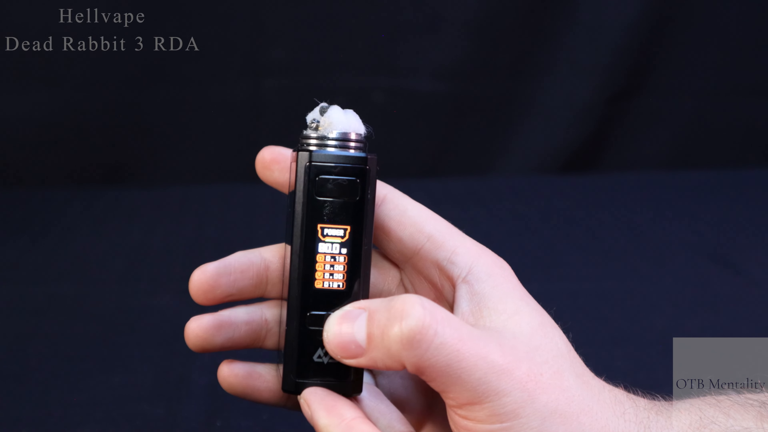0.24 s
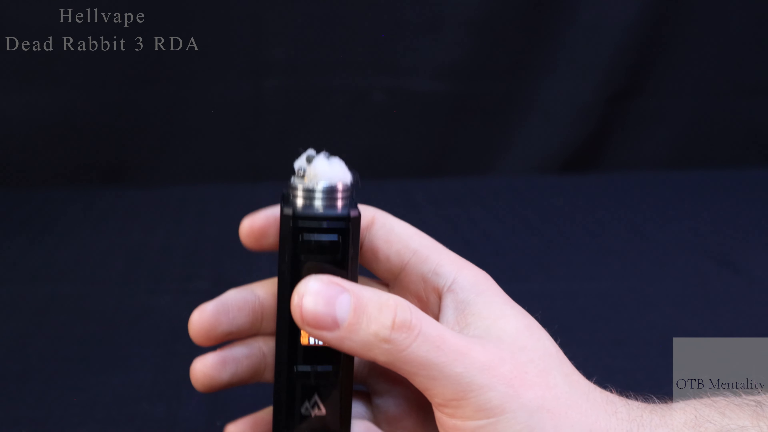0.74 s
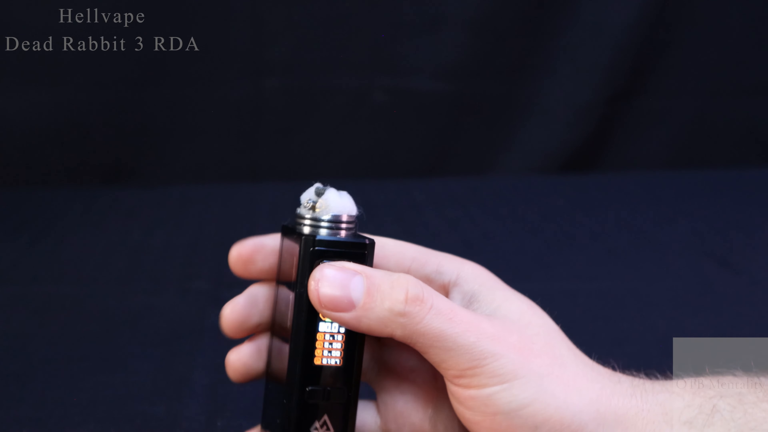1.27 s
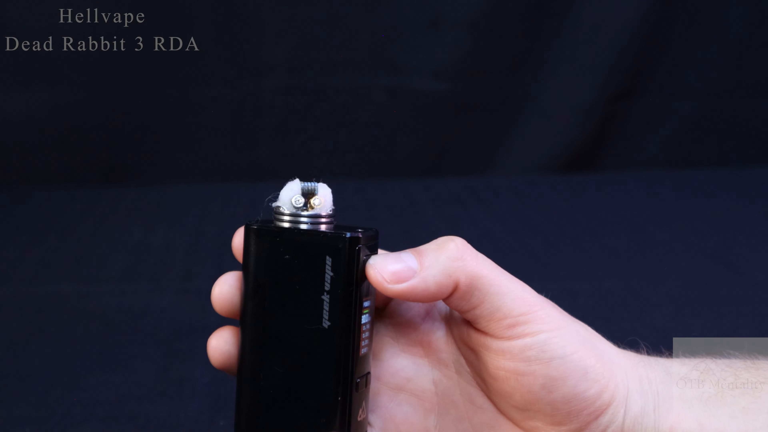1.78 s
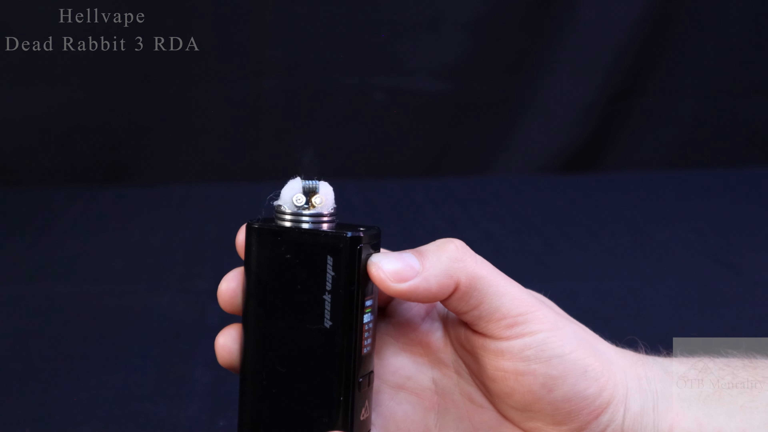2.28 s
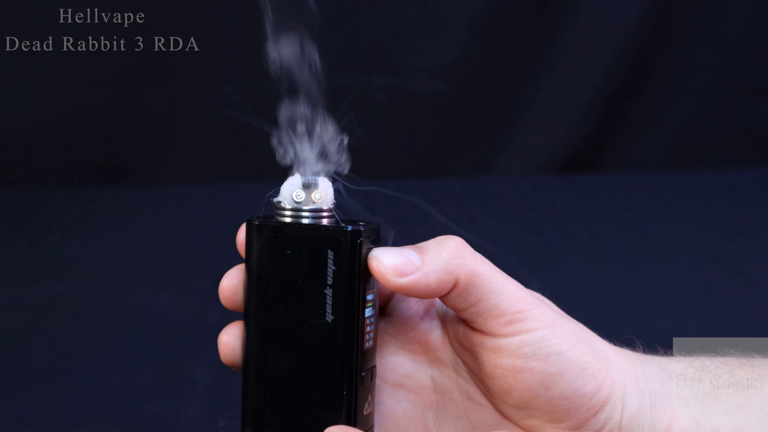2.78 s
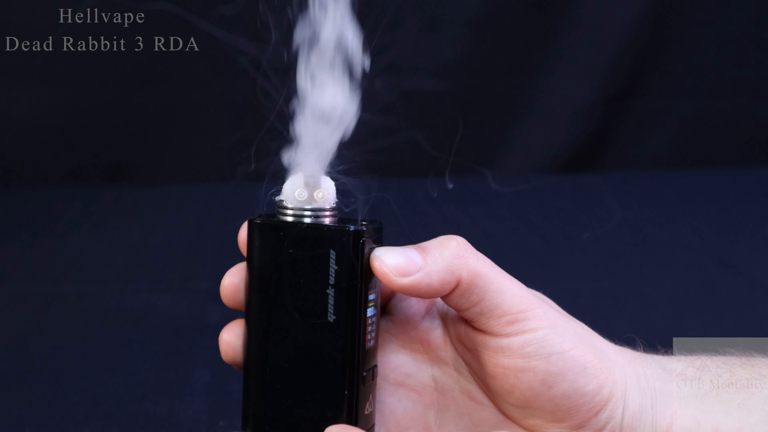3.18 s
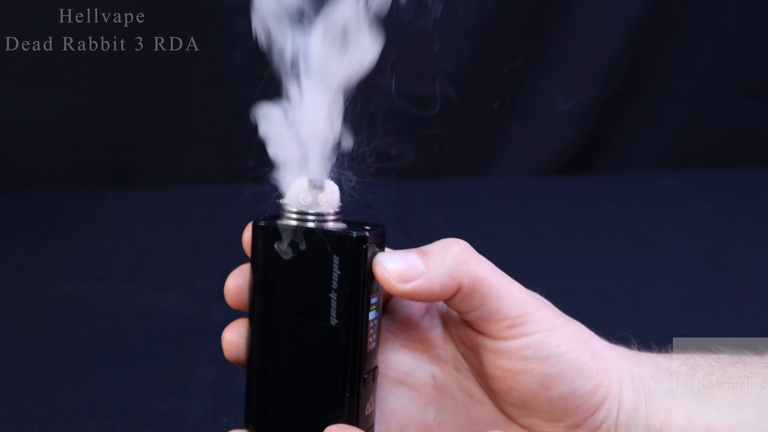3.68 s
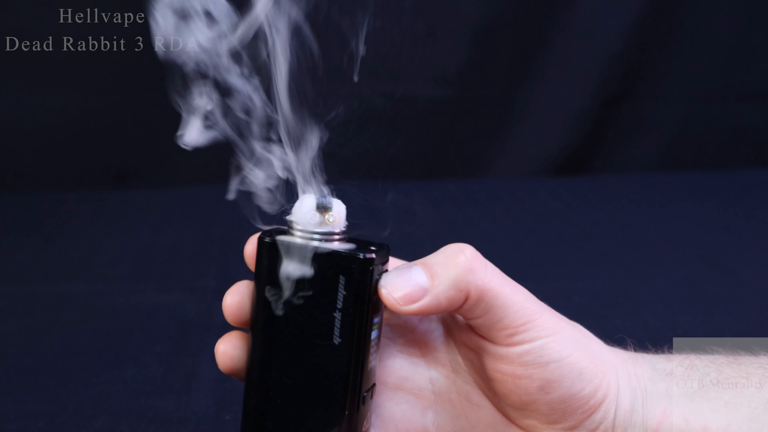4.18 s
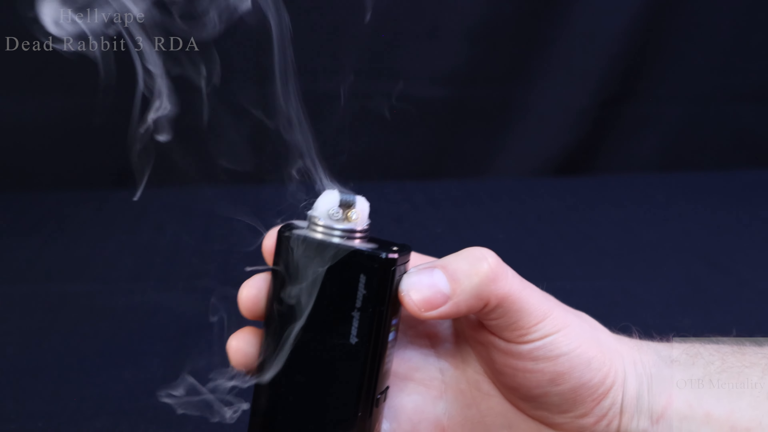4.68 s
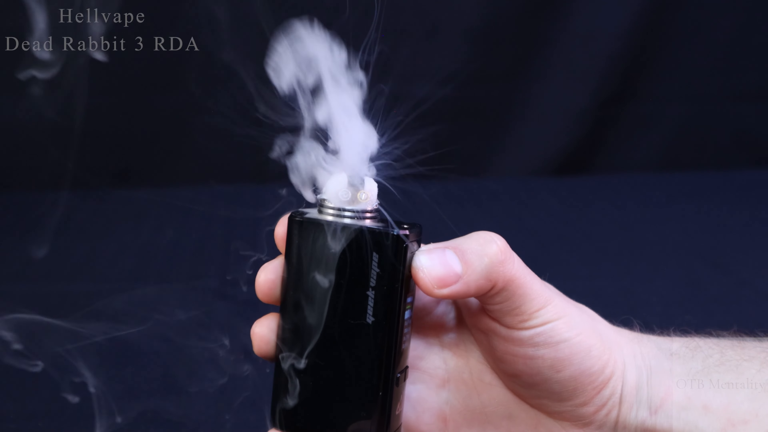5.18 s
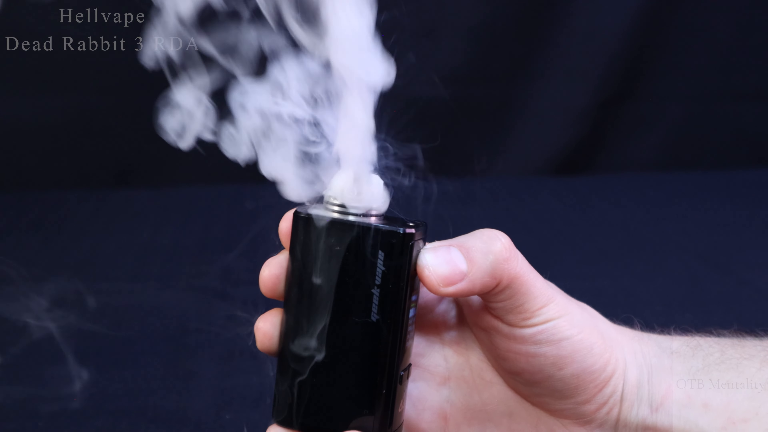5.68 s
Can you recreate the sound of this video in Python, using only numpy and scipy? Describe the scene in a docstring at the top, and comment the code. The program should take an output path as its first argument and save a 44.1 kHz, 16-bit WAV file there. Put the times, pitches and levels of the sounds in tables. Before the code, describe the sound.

Close view of a vaping device in a hushed room with faint hiss and low rumble. First come soft handling thumps, small ticks and skin sliding. A small button snap starts a thin fizz that thickens into boiling crackle. A drop spits, the sizzle dies down, then a second press revives it quickly, with sharper spits and a heavy thud.

```python
"""In a small quiet room, fingers tick and slide on a vaping device while soft thumps set the microphone stand ringing.
The fire button snaps on modes of the case; band-limited bubble bursts start as fine fizz, then coarser boiling joins.
A drop spits, the button is let go and the sizzle dies away as the wire cools.
A second press heats the warm coils faster, and the fizz and boil return with more spits and thumps to the end.
Room tone, hiss and a slow sway of the stand, all shaped noise, lie underneath throughout."""
import sys
import numpy as np
from scipy import signal
from scipy.fft import rfft, irfft, next_fast_len
from scipy.io import wavfile

SR = 44100
rng = np.random.default_rng(int(sys.argv[2]) if len(sys.argv) > 2 else 0)


def wav_out(sig):
    """Save sig, one row per channel (or a flat mono array), as 16-bit PCM at SR to the path in sys.argv[1]."""
    wavfile.write(sys.argv[1], SR, np.round(np.clip(np.atleast_2d(sig).T, -1, 1) * 32767).astype(np.int16))


N = 261954
T = np.arange(N) / SR


def undb(db):
    """Decibels to gain."""
    return 10 ** (np.asarray(db) / 20)


def unit(x):
    """Scale to rms 1."""
    return x / np.sqrt(np.mean(x ** 2))


def colour(x, points):
    """Causal minimum-phase filter with the given (frequency [Hz], level [dB]) outline."""
    hz, db = np.transpose(points)
    size = 2 * next_fast_len(len(x))
    bin_hz = np.fft.rfftfreq(size, 1 / SR) + 1
    log_gain = np.log(undb(np.interp(np.log(bin_hz), np.log(hz), db)))
    # folding the cepstrum forward in time makes the filter causal
    cepstrum = irfft(log_gain)[:size // 2]
    cepstrum[1:] *= 2
    response = np.exp(rfft(cepstrum, size))
    return irfft(rfft(x, size) * response)[:len(x)]


def band(x, lo_hz, hi_hz):
    """Steep band-pass without delay."""
    hz = np.fft.rfftfreq(len(x), 1 / SR) + 1
    loss = np.sqrt((1 + (lo_hz / hz) ** 24) * (1 + (hz / hi_hz) ** 24))
    return irfft(rfft(x) / loss, len(x))


def delayed(x, seconds):
    """The sound a little later, to a fraction of a sample."""
    size = next_fast_len(len(x) + SR // 10)
    turn = np.exp(-2j * np.pi * np.fft.rfftfreq(size, 1 / SR) * seconds)
    return irfft(rfft(x, size) * turn, size)[:len(x)]


def decay(t, t60):
    """Exponential fade that drops 60 dB in t60 seconds."""
    return np.exp(-np.log(1000) * t / t60)


def swell(middle_s, half_s):
    """A smooth rise and fall around a moment."""
    return np.exp(-((T - middle_s) / half_s) ** 2)


def ring(modes, t):
    """Decaying modes after one blow."""
    return sum(undb(db) * np.sin(2 * np.pi * hz * t) * decay(t, t60) for hz, db, t60 in modes)


def add(out, s, sound, db):
    """Mix a sound in at a time and peak level."""
    start = int(s * SR)
    part = sound[:N - start]
    out[start:start + len(part)] += undb(db) * part / np.abs(sound).max()


def room(x, wet_db, t60):
    """A short, soft tail from the nearby walls: decaying coloured noise."""
    t = T[:SR // 2]
    tail = rng.standard_normal(len(t)) * decay(t, t60) * (t > .004)
    tail = colour(tail, [(300, -1.0), (4000, -2.5), (7000, -1), (15000, -5.5)])
    return x + undb(wet_db) * signal.fftconvolve(x, tail / np.linalg.norm(tail))[:N]


def boom(x, wet_db, t60):
    """The room's low modes hum on after a thump: a tail of low, narrow-band noise."""
    t = T[:SR]
    tail = band(rng.standard_normal(len(t)) * decay(t, t60) * (t > .02), 81.5, 200)
    return x + undb(wet_db) * signal.fftconvolve(x, tail / np.abs(rfft(tail)).max())[:N]


# early bounces off the table and nearby things: (delay [s], level [dB])
ECHOES = [(.00312, -19), (.00606, -24.5), (.00715, -27)]


def early_echoes(x):
    """The sound with a few quiet, slightly later copies."""
    return x + sum(undb(db) * delayed(x, s) for s, db in ECHOES)


# room tone and microphone hiss, spectral outline: (frequency [Hz], relative level [dB])
ROOM_TONE = [(20, 0.5), (50, -6.5), (90, -4), (140, -10), (220, -20), (400, -23.5), (800, -29),
             (1600, -32.5), (2500, -36), (5000, -39.5), (10000, -41.5), (15700, -42.5)]


def room_tone():
    """Steady noise, heavy in the bass and faint in the treble."""
    return unit(colour(rng.standard_normal(N), ROOM_TONE)) * undb(-58)


# slow swing of the stand, spectral outline: (frequency [Hz], relative level [dB])
SWAY_COLOUR = [(8, -32), (14, 5.5), (17, 4.5), (21, -23), (35, -13), (70, -64), (200, -65)]
# arm movements that set the stand swaying: (time [s], level before rise and fade [dB])
NUDGES = [(0.0, -54), (0.63, -44), (1.05, -45), (2.7, -41.5), (3.8, -51.5)]
SWAY_RISE_S, SWAY_FADE_S = 0.053, 1  # time constants


def sway():
    """Very low noise for the swaying stand, which builds and dies down after each nudge."""
    swing = np.zeros(N)
    for s, db in NUDGES:
        t = np.maximum(T - s, 0)
        push = undb(db) * (1 - np.exp(-t / SWAY_RISE_S)) * np.exp(-t / SWAY_FADE_S)
        swing = np.hypot(swing, push)  # nudges add as powers
    return swing * unit(colour(rng.standard_normal(N), SWAY_COLOUR))


# ringing of the stand, before each blow's tilt: (frequency [Hz], relative level [dB], t60 [s])
STAND_MODES = [(64.4, 8.5, 0.21), (79, -6.5, 0.15), (111.8, -13.5, 0.39), (140, -18, 0.34),
               (177.6, -37, 0.55)]
# handling blows: (time [s], peak level [dB], contact time [s], brightness [dB per octave],
# time from the blow until the hand damps the ring [s])
THUMPS = [(0.688, -45, 0.024, -6, 0.03), (1.028, -47, 0.014, -3, 0.03), (1.115, -43.5, 0.0098, 10, 0.048),
          (1.402, -40.5, 0.0072, 21, 0.056), (1.4924, -27, 0.0081, 6.5, 0.042),
          (1.6321, -25, 0.0078, 22, 0.03), (1.6536, -11, 0.0083, -18, 0.05), (1.744, -37, 0.012, 20, 0.071),
          (1.931, -35.5, 0.0063, -3, 0.015), (1.966, -39.5, 0.0098, 21, 0.092),
          (3.873, -34.5, 0.011, 32, 0.042), (3.915, -40.5, 0.0055, 5, 0.085),
          (3.955, -40.5, 0.0077, 10, 0.095), (4.301, -53, 0.018, 22, 0.037), (4.813, -43, 0.013, 28, 0.056),
          (4.877, -47.5, 0.0061, 6, 0.087), (5.329, -34.5, 0.0067, -2, 0.022),
          (5.3535, -16.5, 0.0085, -3, 0.046), (5.427, -37.5, 0.012, 5, 0.041)]
SCUFF_DB = -42.5  # peak against the thump
SCUFF_S = 0.018  # the scuff peaks after half this time


def thumps():
    """Soft pushes set the stand ringing until the hand damps it; a longer contact gives a duller thump."""
    out, t = np.zeros(N), T[:SR // 2]
    for s, db, contact_s, bright_db, damp_s in THUMPS:
        push = np.sin(np.pi * np.minimum(t / contact_s, 1)) ** 2
        modes = [(hz, level + bright_db * np.log2(hz), t60) for hz, level, t60 in STAND_MODES]
        ringing = -np.gradient(signal.fftconvolve(push, ring(modes, t))[:len(t)])
        grip = 1 - 0.66 * np.tanh((t - damp_s) / 0.0055)
        add(out, s, ringing * grip, db)
        # dull scuff of the hand with each blow
        scuff = band(rng.standard_normal(len(t)), 290, 520) * t * np.exp(-2 * t / SCUFF_S)
        add(out, s, scuff, db + SCUFF_DB)
    return out


# skin rubbing on the case, spectral outline: (frequency [Hz], relative level [dB])
RUB_COLOUR = [(200, 3.5), (500, -4), (1000, -2), (1700, -2.5), (2400, -2.5), (3100, -9), (3900, -7.5),
              (5000, -14.5), (8000, -16), (15000, -29)]
# strokes as the case is turned: (middle [s], half length [s], level [dB])
SLIDES = [(1.22, 0.2, -77.5), (1.406, 0.083, -66), (1.604, 0.13, -65.5)]


def finger_slides():
    """Skin sliding on the case: noise of uneven strength that swells with each stroke."""
    slips = rng.standard_normal(N) * undb(2.8 * rng.standard_normal(N))
    sliding = sum(undb(db) * swell(s, half_s) for s, half_s, db in SLIDES)
    return sliding * unit(colour(slips, RUB_COLOUR))


# fingertip on the case, before each tick's tilt: (frequency [Hz], relative level [dB])
TICK_COLOUR = [(400, -1), (1300, 4.5), (3000, 2), (5000, -2.5), (7500, 1), (15000, -15)]
# light finger ticks: (time [s], peak level [dB], brightness [dB per octave])
TICKS = [(0.547, -51, 1), (.6380, -45.5, 0), (1.0520, -49, 2)]


def finger_ticks():
    """Fingertips tick on the case: very short decaying bursts of coloured noise."""
    out, t = np.zeros(N), T[:SR // 10]
    for s, db, bright_db in TICKS:
        outline = [(hz, level + bright_db * np.log2(hz)) for hz, level in TICK_COLOUR]
        tap = rng.standard_normal(len(t)) * np.exp(-t / 0.00089)
        add(out, s, colour(tap, outline), db)
    return out


# ringing of button and case, before each click's tilt: (frequency [Hz], relative level [dB], t60 [s])
CASE_MODES = [(418, -13, 0.02), (620, 4.5, 0.011), (790, -1, 0.012), (956, -1.5, 0.032), (1223, -2, 0.026),
              (2040, 3.5, 0.0069), (2600, 1, 0.0087), (3460, 8, 0.0082), (3760, 3.5, 0.0091),
              (4520, -4, 0.0098)]
# fire button pressed, let go and pressed again: (time [s], peak level [dB], brightness [dB per octave])
PRESSES = [(1.9247, -33.5, -2), (3.866, -40.5, -11), (4.8100, -34, -3)]


def button_clicks():
    """The button snaps, a short noise burst, and rings the modes of the case."""
    out, t = np.zeros(N), T[:SR // 10]
    half = len(CASE_MODES) // 2
    for s, db, bright_db in PRESSES:
        modes = [(hz, level + bright_db * np.log2(hz / 1500), t60) for hz, level, t60 in CASE_MODES]
        snap = band(rng.standard_normal(len(t)) * np.exp(-t / 0.006), 300, 10000)
        # the lower and upper modes swing in opposite directions
        ringing = ring(modes[:half], t) - ring(modes[half:], t)
        add(out, s, ringing + undb(-5.5) * snap, db)
    return out


def off_deck(x, lag_s=0.000511, share=0.21):
    """The metal deck under the coils reflects all but the top, which ripples the spectrum about every 2 kHz."""
    return x + share * delayed(band(x, 20, 9000), lag_s)


# bursting drop, before each spit's tilt: (frequency [Hz], relative level [dB])
SPIT_COLOUR = [(150, 2), (400, 4), (950, 5), (1700, 8), (2700, 7), (3600, 6.5), (5300, 5), (8000, 0.5),
               (11000, -6), (15000, -13.5)]
# drops spitting off the wire: (time [s], peak level [dB], brightness [dB per octave],
# spatter behind the snap [dB])
SPITS = [(3.7344, -28.5, -1, -19), (5.2601, -19, -0.6, -29), (5.466, -32, 1.5, -22),
         (5.6500, -30.5, 4.5, -8)]


def spits():
    """Now and then a whole drop bursts off the wire: a snap, the collapse of its steam, then brief spatter."""
    out, t = np.zeros(N), T[:SR // 20]
    for s, db, bright_db, spatter_db in SPITS:
        outline = [(hz, level + bright_db * np.log2(hz)) for hz, level in SPIT_COLOUR]
        snap = 1. * (t == 0)
        collapse = -0.13 * delayed(snap, 0.00029)
        spatter = undb(spatter_db) * rng.standard_normal(len(t)) * np.exp(-t / 0.0023)
        burst = off_deck(snap + collapse + spatter, lag_s=0.000548, share=1.0)
        add(out, s, colour(burst, outline), db)
    return out


# bursting bubbles, spectral outline: (frequency [Hz], relative level [dB])
BUBBLE_COLOUR = [(150, -19.5), (330, -6), (750, -6.5), (1250, -4), (2300, -3.5), (2950, -5), (3500, -0.5),
                 (4700, -3), (6700, -2), (8100, 1.5), (10100, -2.5), (10700, -5.5), (12000, -1),
                 (15700, -7)]


def bubbles(per_s, spread_db):
    """Tiny random bursts of uneven size, a little stronger in brief flurries."""
    flurry = unit(band(rng.standard_normal(N), 1.6, 40))
    size_db = spread_db * np.clip(rng.standard_normal(N), -2, 2) + .5 * flurry
    bursts = (rng.random(N) < per_s / SR) * rng.standard_normal(N) * undb(size_db)
    return off_deck(colour(bursts, BUBBLE_COLOUR))


# first firing from cold, second on a warm coil: (warm-up [s], steepness of the S-shaped rise [exponent])
WARM_UPS = [(0.76, 2.03), (0.17, 1.27)]


def heat(cool_s):
    """Wire heat 0-1: an S-shaped rise while the button is down, an exponential fall once it is let go."""
    out = np.zeros(N)
    for k, (s, _, _) in enumerate(PRESSES):
        start = int(s * SR)
        t, before = T[:N - start], out[start]
        if k % 2 == 0:  # pressed
            warm_s, steepness = WARM_UPS[k // 2]
            out[start:] = 1 - (1 - before) * np.exp(-(t / warm_s) ** steepness)
        else:  # let go
            out[start:] = before * np.exp(-t / cool_s)
    return out


SIMMER_DB = -22.5  # a barely hot wire, against full boil


def boil(lo_hz, hi_hz, per_s, spread_db, db, soak_db_per_s, joins_s, sets_in_s, lag_s, cool_s):
    """Bubbles of one size set in after a delay, follow the wire's heat and drift in level as the wick soaks it up."""
    button_down = sum(T >= s for s, _, _ in PRESSES) % 2
    fired_s = np.cumsum(button_down) / SR
    joined = np.clip((T - PRESSES[0][0] - joins_s) / sets_in_s, 0, 1)
    hot = np.interp(T - lag_s, T, heat(cool_s))
    level_db = db + SIMMER_DB * (1 - hot) + soak_db_per_s * fired_s
    return unit(band(bubbles(per_s, spread_db), lo_hz, hi_hz)) * joined * undb(level_db)


# bubble sizes, coarse to finest: (low edge [Hz], high edge [Hz], bursts [per s], size spread [dB],
# level at full boil before heat soak [dB], change as the wick soaks up heat [dB per s of firing],
# joins after the first press [s], sets in over [s], lag behind the wire [s], cooling time constant [s])
BUBBLE_SIZES = [(203, 2960, 5000, 2, -59.5, 1.74, 0.29, 0.63, 0.036, 0.2),
                (3100, 7560, 10000, 1, -56.2, 1.26, 0.31, 0.12, 0.024, 0.28),
                (7430, 10500, 23000, 4, -50, -1.47, 0.018, 0.064, 0, 0.42),
                (10600, 16500, 17000, 2.5, -55, -2.5, 0.027, 0.05, 0, 0.23)]
# sparse larger bursts that prickle through the hiss: one row with the same columns
PRICKLE = (1800, 17000, 130, 0, -68.5, 1.2, 0.37, 0.09, 0.02, 0.28)
FLARE_S, FLARE_WIDTH_S, FLARE_DB = 2.446, 0.075, 4  # middle, half length, peak boost


def sizzle():
    """Fine fizz comes first and lasts longest; larger, lower bubbles join as the wire gets hot."""
    # the sizzle flares briefly as boiling takes hold
    flare = undb(FLARE_DB * swell(FLARE_S, FLARE_WIDTH_S))
    return flare * (sum(boil(*size) for size in BUBBLE_SIZES) + boil(*PRICKLE))


def scene():
    """Coils and hand in the room, with the thumps carried through the stand."""
    background = room_tone() + sway()
    stand = boom(thumps(), wet_db=-6.5, t60=0.42)
    hand = room(finger_slides() + finger_ticks() + button_clicks(), wet_db=-8.0, t60=0.36)
    coils = room(early_echoes(spits() + sizzle()), wet_db=-9.5, t60=0.18)
    return (background + stand + hand + coils)[None]


TOP_HZ = 15750


def record(dry):
    """The recorder cuts the top with a steep low-pass."""
    return signal.sosfilt(signal.ellip(12, .1, 80, TOP_HZ, fs=SR, output="sos"), dry)


dry = scene()
out = record(dry)
wav_out(out)
```